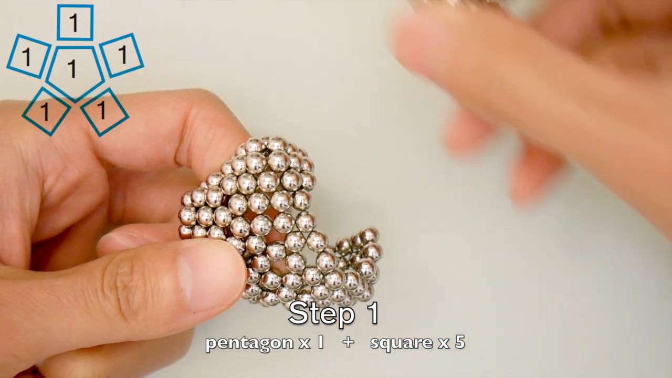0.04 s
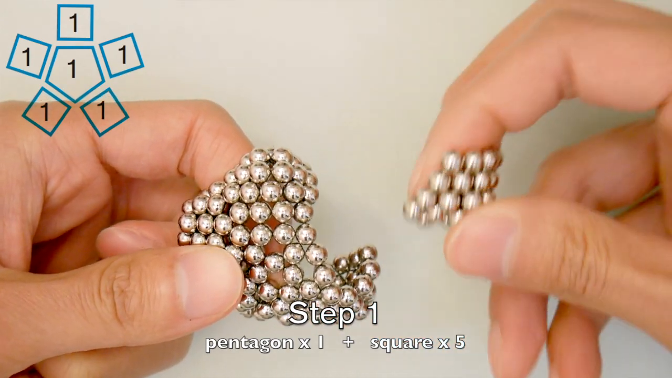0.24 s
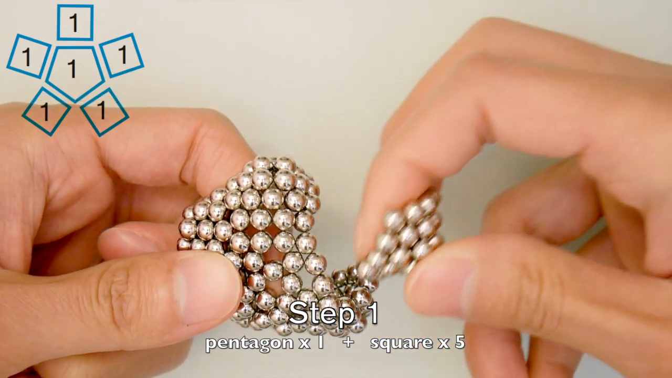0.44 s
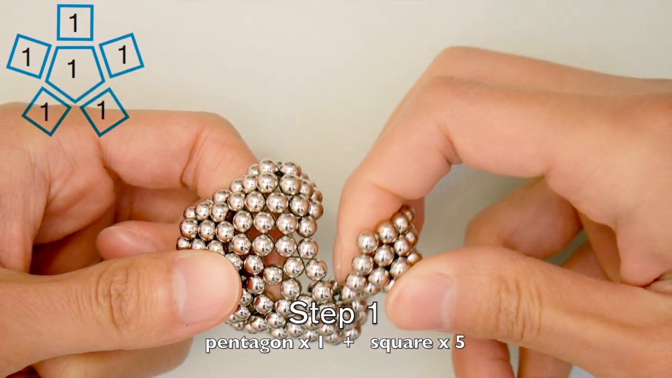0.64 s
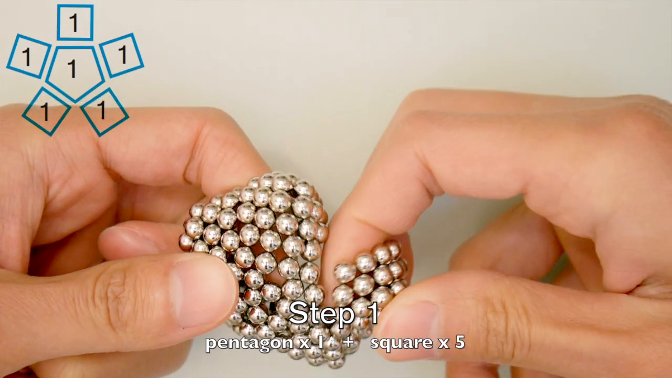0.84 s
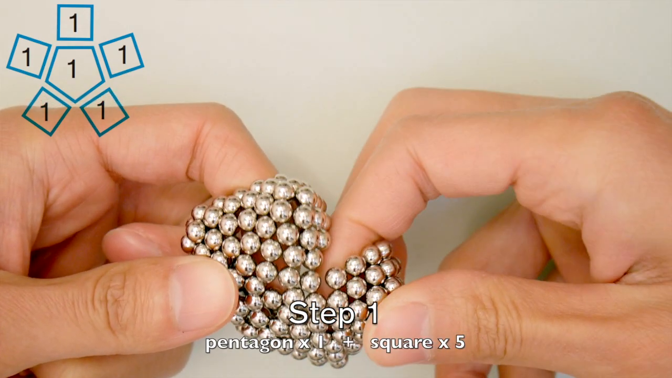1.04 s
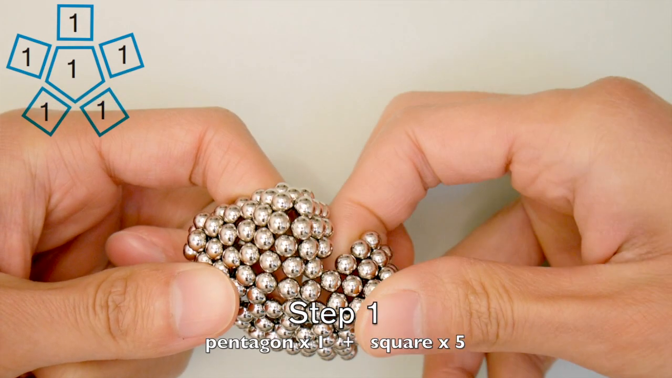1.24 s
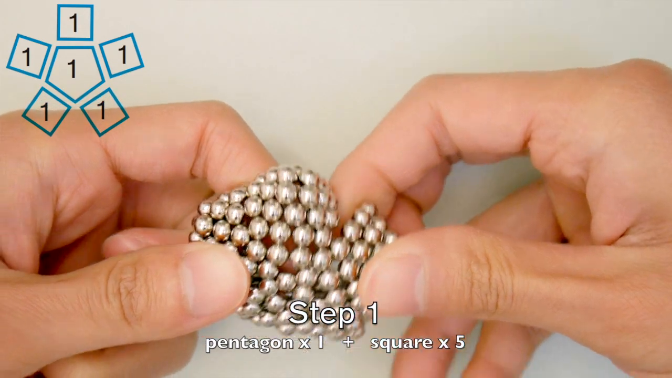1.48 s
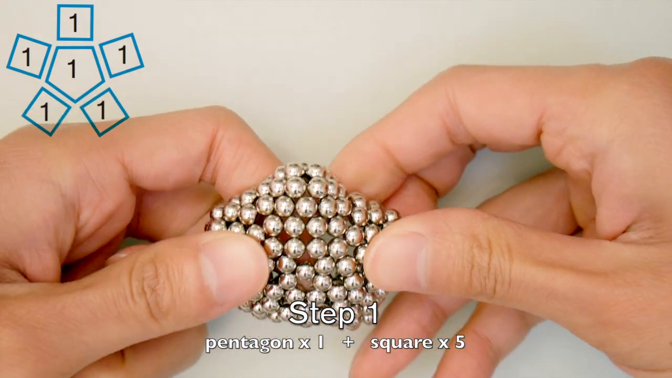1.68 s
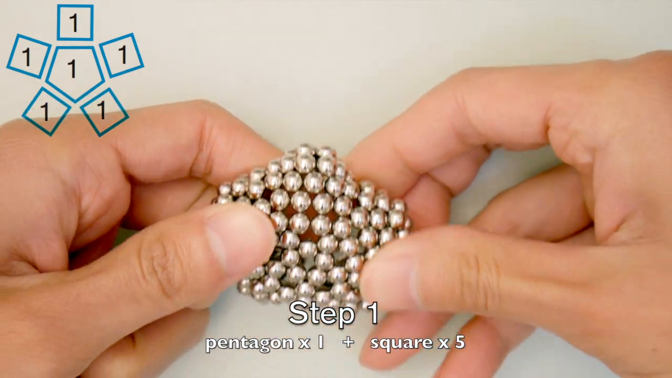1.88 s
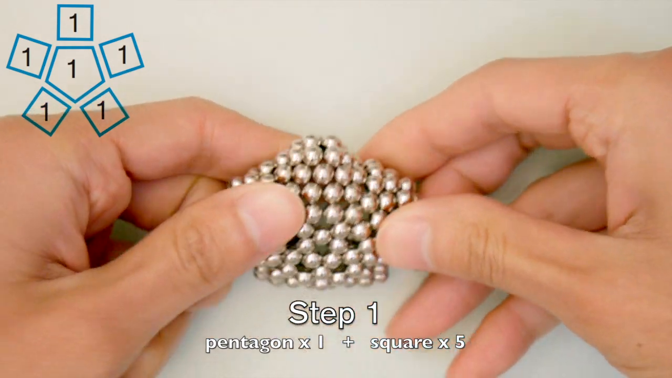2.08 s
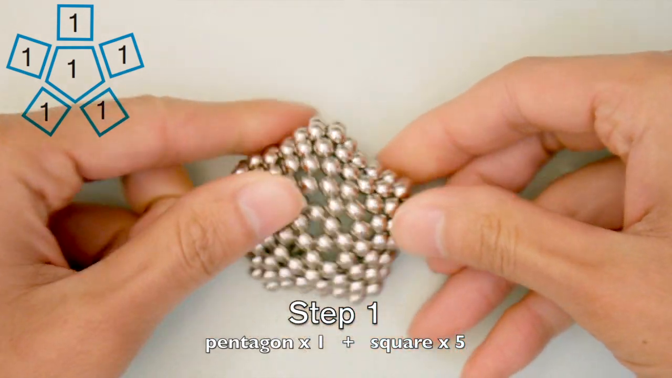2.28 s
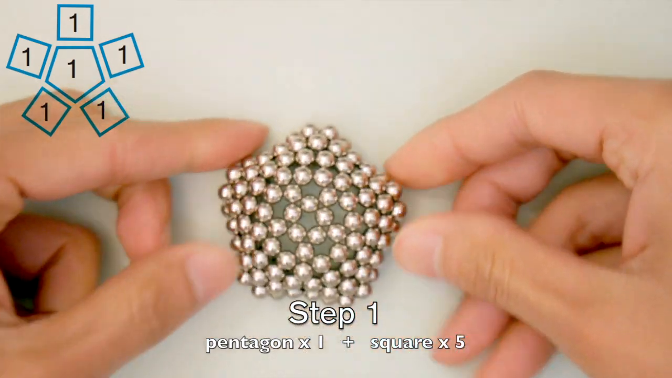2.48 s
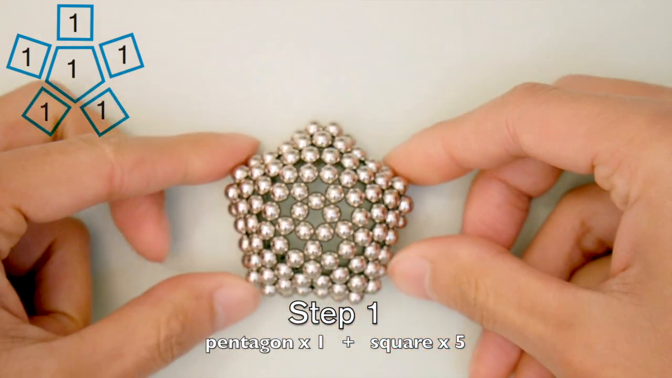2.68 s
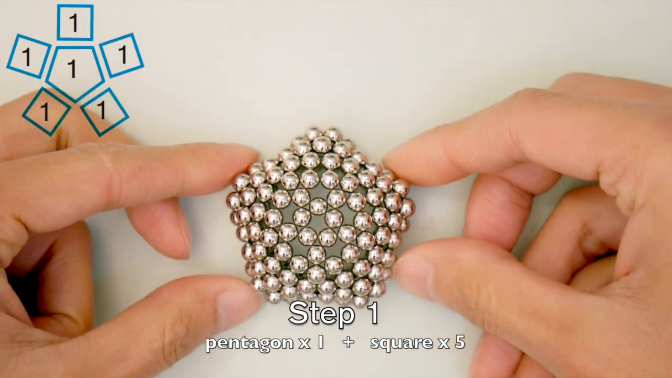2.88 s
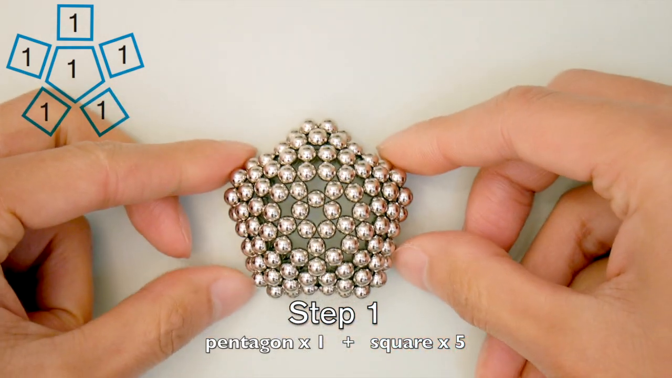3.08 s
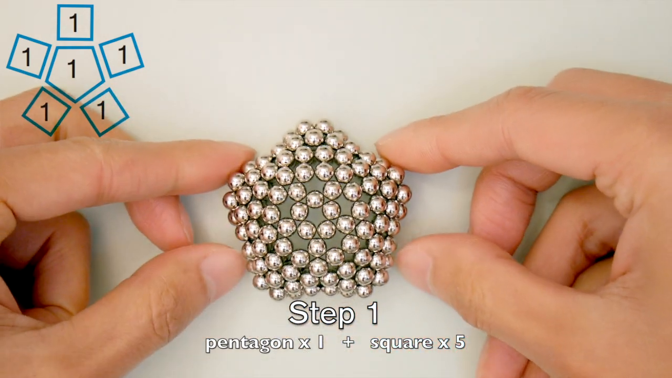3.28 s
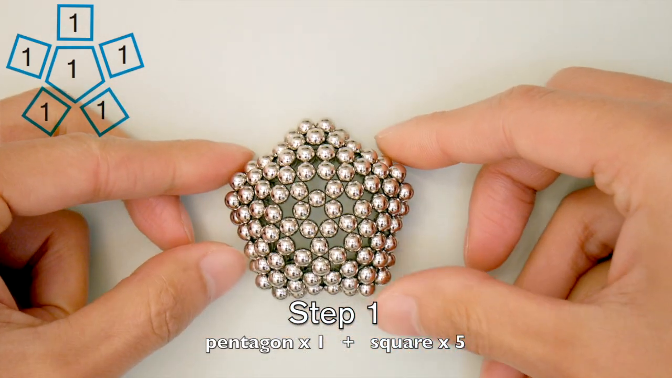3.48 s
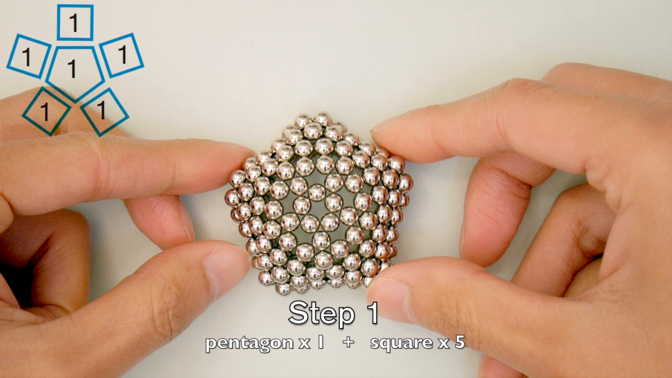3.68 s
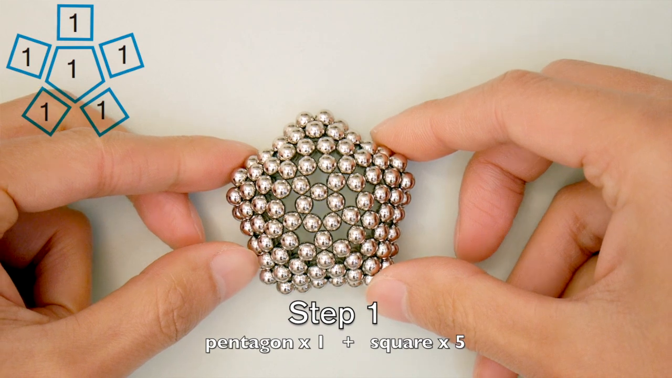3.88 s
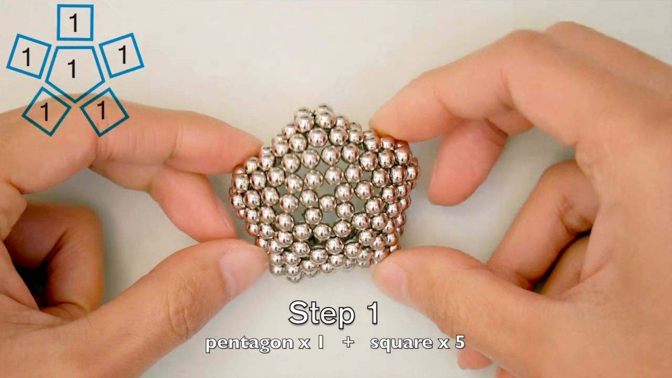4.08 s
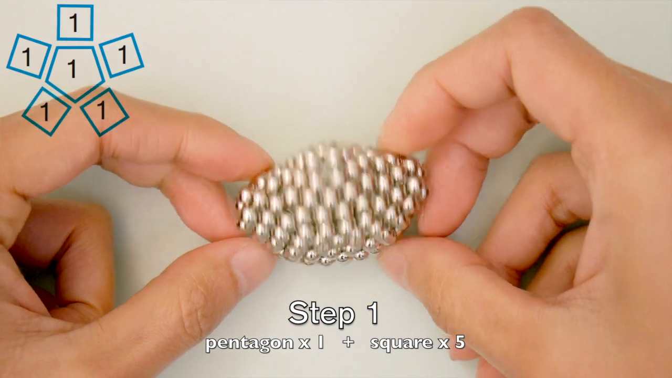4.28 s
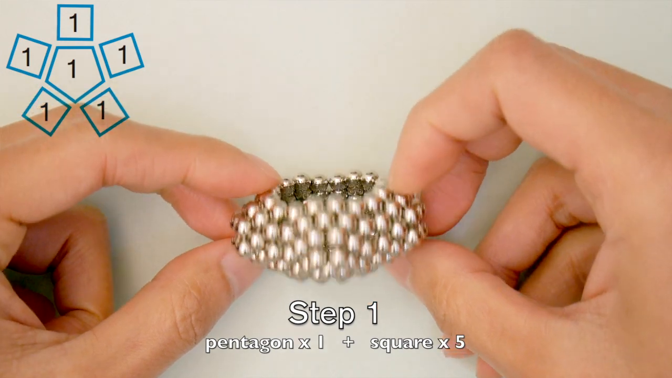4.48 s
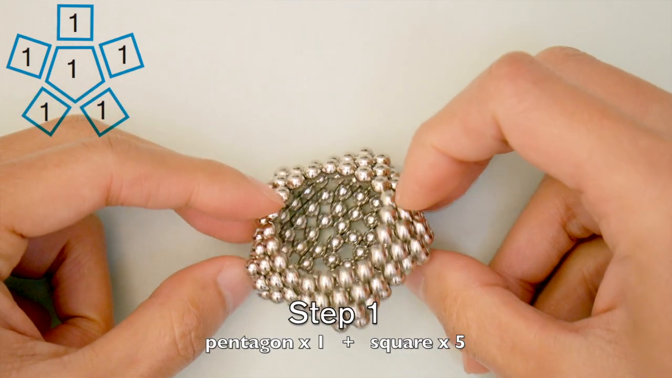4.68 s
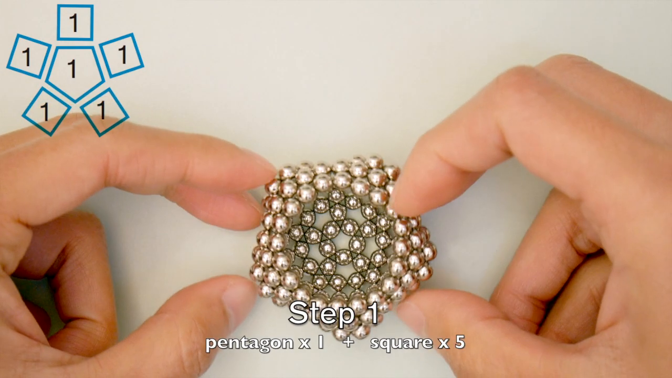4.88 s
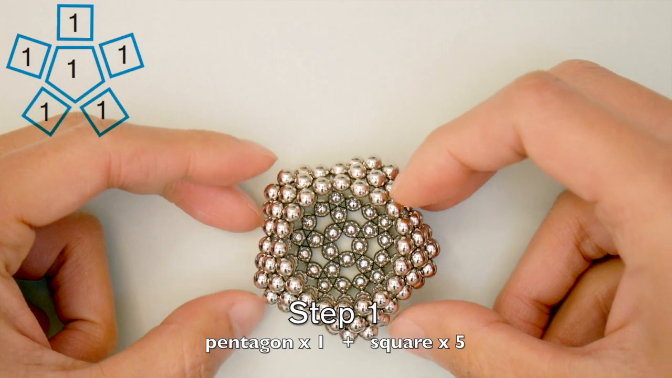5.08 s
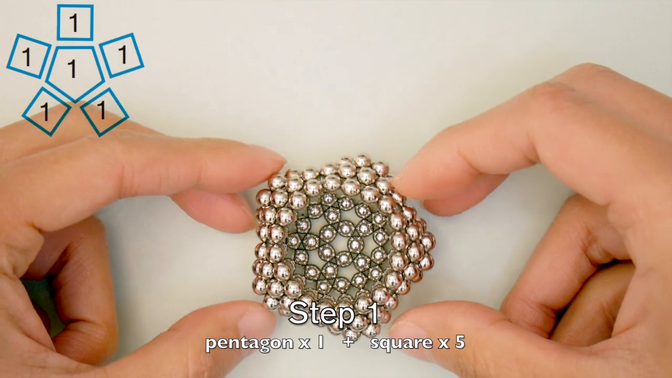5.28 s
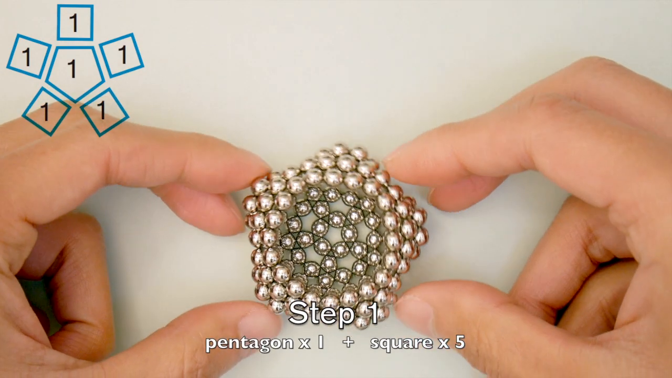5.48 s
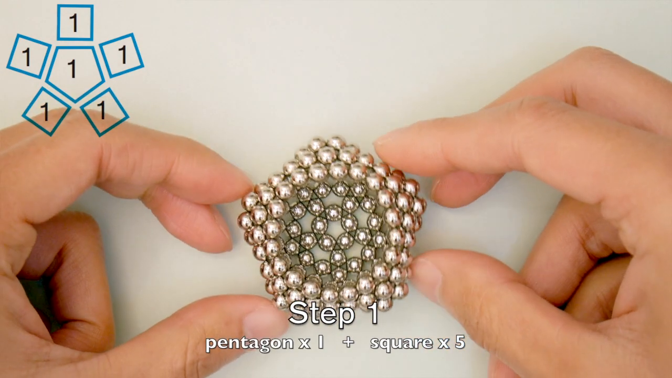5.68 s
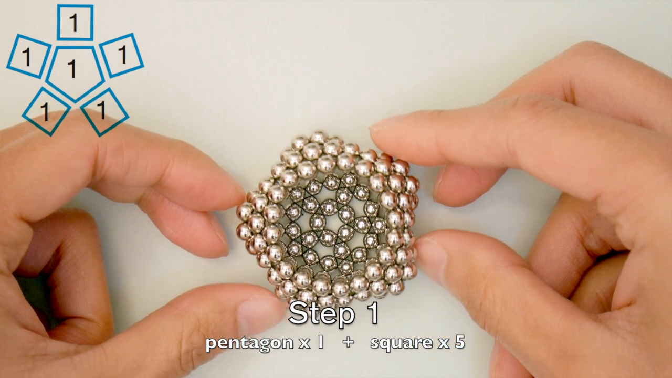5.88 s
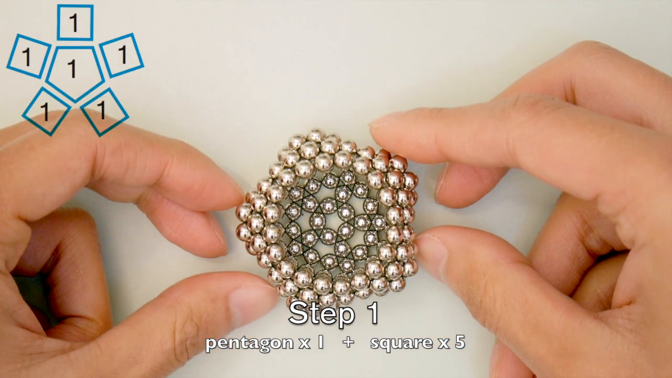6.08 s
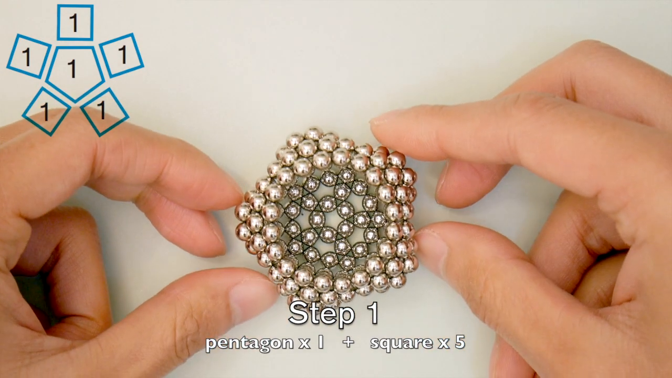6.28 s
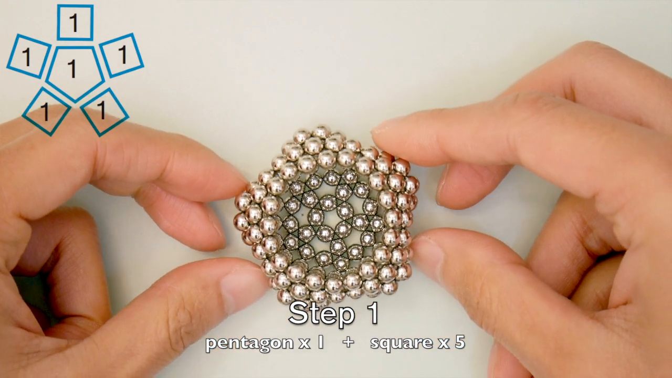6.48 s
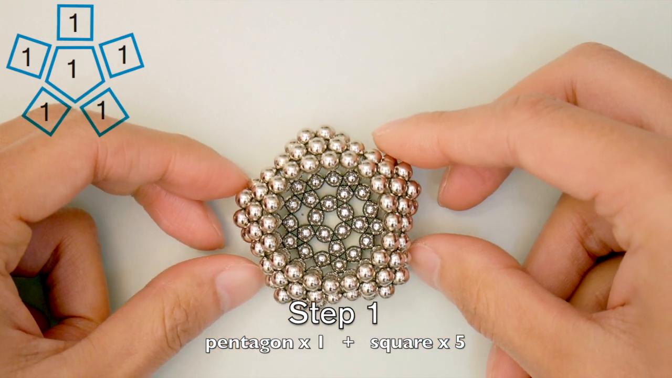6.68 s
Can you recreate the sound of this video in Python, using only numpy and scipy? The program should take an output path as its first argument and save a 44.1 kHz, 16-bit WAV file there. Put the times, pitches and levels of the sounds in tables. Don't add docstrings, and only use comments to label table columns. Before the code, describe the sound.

Small steel magnet balls rattle and snap together, then the cluster knocks hard on a wooden table and is later rolled over, above low room hum.

```python
import sys
import numpy as np
from scipy import signal
from scipy.io import wavfile
from scipy.ndimage import uniform_filter1d

SR = 44100
rng = np.random.default_rng(int(sys.argv[2]) if len(sys.argv) > 2 else 0)


def linear_from_db(decibels):
    return 10 ** (np.asarray(decibels, float) / 20)


def wav_record(signal):
    frames = np.transpose(np.atleast_2d(signal))
    bounded = np.clip(frames, -1, 1)
    quanta = np.round(bounded * 32767).astype(np.int16)
    wavfile.write(sys.argv[1], SR, quanta)


N = 297448


def evened(x):
    return x / np.sqrt(np.mean(x ** 2) + 1e-20)


def read(points, hz):
    f, value = np.transpose(points)
    return np.interp(np.log(hz + 1), np.log(f + 1), value)


def add(mix, s, sound):
    part = mix[..., round(s * SR):][..., :sound.shape[-1]]
    part += sound[..., :part.shape[-1]]


def cut(x, hz, kind, order):
    return signal.sosfilt(signal.butter(order, hz, kind, fs=SR, output="sos"), x)


def struck(colour, size=4096):
    gain_db = np.maximum(read(colour, abs(np.fft.fftfreq(size, 1 / SR))), -100)
    log_gain = np.log(linear_from_db(gain_db))
    taps = np.fft.ifft(np.exp(np.conj(signal.hilbert(log_gain)))).real[:size // 2]
    return taps / np.linalg.norm(taps)


def level(strokes):
    t = np.arange(0, N / SR + .002, .001)
    s, db, rise, fall = np.transpose(strokes)[..., None]
    slope_s = np.maximum(np.where(t < s, rise, fall), .002)
    gain = linear_from_db(db - 20 * abs(t - s) / slope_s).sum(axis=0)
    return np.interp(np.arange(N) / SR, t, gain)


# pitch_hz, fade_s (time to fall 60 dB)
ROOM_FADE = [(100, 0.14), (400, 0.52), (1200, 0.31), (4000, 0.16), (10000, 0.24), (15000, 0.1)]


def room(x, wet_db, same):
    taps = np.zeros((2, SR // 2))
    at = np.arange(100, SR // 2 - 12, 12) + rng.integers(0, 12, (2, (SR // 2 - 101) // 12))
    np.put_along_axis(taps, at, rng.choice([-1., 1.], at.shape), 1)
    hz, t, z = signal.stft(taps, SR, nperseg=256)
    fading = linear_from_db(-60 * t / read(ROOM_FADE, hz)[:, None])
    left, other = signal.istft(z * fading, SR, nperseg=256)[1]
    same = np.clip(same, 0, 1)
    tail = np.array([left, same * left + np.sqrt(1 - same ** 2) * other])
    return linear_from_db(wet_db) * signal.fftconvolve(x, tail / np.linalg.norm(left), axes=1)[:, :N]


# pitch_hz, likeness (0-1)
LIKENESS = [(60, 0.09), (130, 0.82), (290, 0.67), (640, 0.3), (1410, 0.94), (3100, 0.5), (6820, 0.49),
            (15000, 0.34)]
# pitch_hz, left_over_right_db
LEAN_LEFT = [(60, 13.5), (110, 9.5), (200, 0.5), (380, 0), (700, 4.5), (1290, -1), (2380, 1), (4400, -1),
             (8120, 1), (15000, -2.5)]


def air(colour, db, patchy_db, swell_db):
    frames, hz = N // 512 + 5, np.fft.rfftfreq(2048, 1 / SR)
    a, b, c, d, patches = rng.standard_normal((frames, 1025, 5)).T
    patches = uniform_filter1d(patches, size=6, axis=0)
    patches = evened(uniform_filter1d(patches, size=24, axis=1))
    t = np.arange(frames) * 512 / SR
    swell = evened(sum(np.sin(2 * np.pi * (f * t + rng.random())) / np.sqrt(f)
                       for f in np.geomspace(.15, 3, 20)))
    same = np.clip(read(LIKENESS, hz), -1, 1)[:, None]
    lean = linear_from_db(read(LEAN_LEFT, hz) / 2)[:, None]
    left = a + 1j * b
    right = same * left + np.sqrt(1 - same ** 2) * (c + 1j * d)
    z = np.array([left * lean, right / lean])
    z *= linear_from_db(read(colour, hz)[:, None] + patchy_db * patches + swell_db * swell)
    return linear_from_db(db) * evened(signal.istft(z, nperseg=2048, noverlap=1536)[1][:, :N])


def machine(peaks, steady_db, swells):
    out, noise = np.zeros((2, N)), rng.standard_normal((N, 2)).T
    shared = noise + 0.66 * noise[::-1]
    for hz, width, db in peaks:
        band = signal.iirpeak(hz, hz / np.clip(width, 8, 200), SR)
        once = signal.lfilter(*band, shared)
        out += linear_from_db(db) * signal.lfilter(*band, once)
    return (linear_from_db(steady_db) + level(swells)) * evened(out)


# pitch_hz, level_db, waver_db
MAINS_TONES = [(48.7, -78, 1), (102, -69.5, 3.5), (127.7, -73, 5.5)]


def mains():
    t = np.arange(N) / SR
    noise = rng.standard_normal((N, len(MAINS_TONES))).T
    wavers = evened(uniform_filter1d(uniform_filter1d(noise, size=3000), size=3000))
    out = np.zeros(N)
    for (hz, db, waver_db), waver in zip(MAINS_TONES, wavers):
        strength = np.sqrt(2) * linear_from_db(db + waver_db * waver)
        out += strength * np.sin(2 * np.pi * hz * t + 0.13 * waver_db * waver)
    return out


# pitch_hz, level_db (per Hz)
HUM_COLOUR = [(44, -45.5), (75, -11.5), (86, -8), (107, -2), (150, -7.5), (167, -6.5), (190, 2.5),
              (245, -11), (311, -12), (401, -7.5), (509, -10.5), (691, -13.5), (890, -15), (976, -13),
              (1800, -31.5), (2340, -83), (3960, -120)]
# pitch_hz, level_db (per Hz)
HISS_COLOUR = [(1290, -87), (2200, -14.5), (2690, -21), (2940, -9), (3270, -17.5), (4130, -10.5),
               (4860, -7.5), (5530, -2), (6500, 2), (8090, 1), (8420, 2), (9590, 4), (13100, -6),
               (14500, -11), (15200, -17)]
# pitch_hz, width_hz, level_db
DRONE_PEAKS = [(667, 195, 2), (990, 200, -4)]
WHIRR_PEAKS = [(290.8, 85, 0)]
# peak_s, level_db, rise_s, fall_s (both over 20 dB)
DRONE_COMES = [
    (0.2, -79.5, 5.5, 0.73),
    (1.65, -65.5, 4, 0.42),
    (2.42, -54, 0.34, 0.47),
    (3.1, -70, 1, 4.3),
    (5.2, -72, 1.2, 2.7),
]
# peak_s, level_db, rise_s, fall_s (both over 20 dB)
WHIRR_COMES = [
    (0.02, -59.5, 0.22, 0.96),
    (1.7, -63, 2.1, 0.55),
    (2.7, -62.5, 0.32, 5.6),
    (3.25, -67, 2.2, 0.18),
    (4.352, -75, 0.35, 0.51),
    (4.838, -62.5, 0.8, 0.2),
    (5.75, -65.5, 0.36, 2),
]


def background():
    hum = cut(air(HUM_COLOUR, -60, 1.8, .8), 1900, "low", order=5)
    rumble = air([(15, 1.5), (30, 10), (60, 0), (80, -16), (200, -90)], -86.5, 0.14, .3)
    drone = machine(DRONE_PEAKS, -93, DRONE_COMES)
    whirr = machine(WHIRR_PEAKS, -84.5, WHIRR_COMES)
    hiss = cut(air(HISS_COLOUR, -75, .6, .3), 15400, "low", order=20)
    return hum + rumble + drone + whirr + hiss + mains() * linear_from_db([[1.5], [-1.5]])


# pitch_hz, level_db (per Hz)
STEEL_COLOUR = [(1470, -66.5), (2500, -48), (2730, -72), (3950, -37), (4170, -31), (4480, -25.5),
                (7180, -7), (7760, -8.5), (9830, -2.5), (11700, -4.5), (13200, -11.5), (15200, -24),
                (16500, -49)]
# pitch_hz, level_db (per Hz)
CLACK_COLOUR = [(1200, 6.5), (1800, -6.5), (2500, -13), (3500, -9.5), (4500, -2.5), (5300, -2), (6500, -1),
                (8000, -21.5), (10000, -43)]
# start_s, peak_db, left_over_right_db, chatter_pitch_hz, clack_db
ROW_SNAPS = [(0.0117, -43, 4, 8900, -22), (0.0135, -38.5, -5, 6060, -40), (0.0165, -46, -9, 10400, -27),
             (0.5967, -18, -3.5, 10040, -49), (0.8071, -33.5, -2.5, 9040, -46), (0.977, -40, 3, 11800, -53),
             (0.9776, -44, 0, 8500, -53), (0.98, -27, -2, 7840, -54), (0.9802, -44, 5, 12500, -56),
             (0.9806, -28.5, -4, 10500, -60), (0.9812, -29, -4, 8400, -58), (0.9827, -32, 0, 10600, -64),
             (1.271, -57, 1.5, 11500, -32), (1.2716, -56, 0, 8600, -40), (1.3066, -38.5, -1, 6000, -53),
             (1.3074, -41.5, -3, 10150, -50), (1.3096, -44, -2, 10500, -50), (1.3113, -54, 0, 9000, -50),
             (1.3142, -54, -3, 11500, -54), (2.1475, -30.5, -2, 10600, -22.5),
             (2.1537, -31.5, -4, 10400, -28), (2.2032, -38, -2, 11100, -20.5), (2.2623, -46, -1, 6600, -31),
             (2.2635, -60, 0, 9500, -33), (2.4204, -25, 0.5, 10630, -18), (2.4235, -28.5, -17, 9760, -39),
             (2.4354, -43, -1.5, 10600, -50), (2.4378, -30, -0.5, 10640, -43), (2.3085, -50, -3, 6400, -24),
             (2.3245, -50, -1.5, 7500, -31), (4.0922, -38, -2, 11500, -18.5), (4.0925, -41, -4, 8800, -30),
             (4.0946, -44, -7, 10200, -41), (4.098, -46, -2, 11500, -23), (4.6259, -47, -3, 6270, -38),
             (4.6285, -57, 3, 9450, -38), (4.9729, -39, -2, 11000, -21.5)]
# start_s, peak_db, left_over_right_db
BALL_SHIFTS = [(0.173, -54, -3), (0.188, -52, 1), (0.211, -59, 0), (0.451, -59, 0), (1.8047, -56.5, 2),
               (2.159, -38.5, 4), (2.168, -55, 2), (2.322, -53, -1), (2.811, -60.5, 9), (4.242, -58, 0.5),
               (4.4387, -55, 1), (4.491, -52.5, 1), (4.683, -53, -5), (4.807, -56, -1), (4.944, -51, -1),
               (4.949, -60, 0), (4.956, -48, 1), (4.965, -58, 0)]
# delay_s, level_db
NEAR_ECHOES = [
    (.001, -13),
    (.0024, -10),
    (.0048, -15),
    (.0074, -13),
    (.012, -17),
]
# pitch_hz, left_over_right_db
SIDE_SHADE = [(2000, -10.5), (5000, -8), (8500, -1), (11500, -6), (14000, -12.5)]


def ticks():
    near, spread, t = np.zeros((2, N)), np.zeros((2, N)), np.arange(80) / SR
    steel, clack = struck(STEEL_COLOUR)[:600], struck(CLACK_COLOUR)[:600]
    shift_hz, shift_clack_db = 9500, -21.5
    rows = ROW_SNAPS + [(*row, shift_hz, shift_clack_db) for row in BALL_SHIFTS]
    luck = rng.standard_normal((len(rows), 80))
    for (s, db, pan_db, hz, mass_db), chance in zip(rows, luck):
        db = float(db)
        chatter_s = .0002 if db > -27 else .0001
        contacts = (np.cos(2 * np.pi * hz * t) + .5 * chance) * t ** 2 * np.exp(-t / chatter_s)
        contacts[8] += .9 * abs(contacts).max()
        tick = np.convolve(contacts, steel)
        tick /= abs(tick).max()
        mass = linear_from_db(mass_db + 20.0) * clack / abs(clack).max()
        gain = linear_from_db(db) * linear_from_db([[pan_db / 2], [-pan_db / 2]])
        add(spread, s, gain * (np.linalg.norm(tick) * steel + mass))
        tick[8:608] += mass
        add(near, s + .0009, gain * tick)
    echoed = near.copy()
    for k, (s, db) in enumerate(NEAR_ECHOES):
        add(echoed[0], s, linear_from_db(db) * near[0])
        add(echoed[1], s + (-1) ** k * .00009, linear_from_db(db) * near[1])
    echoed += cut(room(spread, -3.0, 0.52), 14400, "low", order=14)
    shade = np.array([struck([(hz, side * db / 2) for hz, db in SIDE_SHADE], size=256) for side in (1, -1)])
    return signal.oaconvolve(echoed, shade, axes=1)[:, :N]


# peak_s, level_db, rise_s, fall_s (both over 20 dB)
RUB_STROKES = [(0.03, -62, 0.12, 0.17), (0.105, -69, .06, 0.088), (0.208, -57, 0.11, 0.081),
               (0.26, -66, .04, 0.047), (0.43, -71.5, 0.065, 0.58), (0.575, -74, 0.036, 0.0074),
               (1.676, -72, 1, 0.03), (1.86, -84, .015, 0.035), (2.0, -72, .2, 0.7),
               (2.228, -62, .01, 0.076), (2.315, -70.5, 0.12, 0.85), (2.385, -77, 0.036, 0.19),
               (2.408, -61, 0.014, 0.0052), (2.61, -71.5, 0.18, 0.047), (2.8, -79, 0.58, 1),
               (4.135, -66.5, 0.044, 0.061), (4.24, -78, .03, 0.15), (4.385, -69, 0.02, 0.15),
               (4.45, -82, 0.095, 0.082), (4.65, -65, .015, 0.096), (4.815, -67, 0.041, 0.06),
               (4.933, -69, .045, 0.011), (4.962, -55, .02, 0.032), (5.003, -68, 0.013, 0.047),
               (5.14, -83, 0.1, 0.016)]


def rubs():
    size = linear_from_db(4.8 * np.minimum(rng.exponential(1, (N, 2)), 4)).T
    grains = size * rng.standard_normal((N, 2)).T
    grains = grains * (rng.random(N) < 5000 / SR)
    ball = (struck(STEEL_COLOUR) + 0.33 * struck(CLACK_COLOUR))[None, :600]
    dry = evened(signal.oaconvolve(grains + 0.66 * grains[::-1], ball)[:, :N]) * level(RUB_STROKES)
    dry = cut(dry, 14800, "low", order=8)
    return linear_from_db(-12.0) * dry + room(dry, -3.5, 0.4)


def rings(modes):
    t = np.arange(SR // 2) / SR
    out = np.zeros(len(t))
    for hz, db, t60 in modes:
        fade_s = np.clip(t60, .03, min(.8, 250 / hz))
        out += linear_from_db(db - 60 * t / fade_s) * np.sin(2 * np.pi * hz * t)
    out *= 1 - np.exp(-t / .004)
    return out / np.linalg.norm(out)


# start_s, peak_db, place (0 edge - 1 middle), hardness (0-1)
TABLE_KNOCKS = [(0.05, -52, 0.25, .5), (0.08, -45, 0.36, 0.73), (0.172, -46, 0.56, 0.9),
                (0.242, -45, 0, 0.6), (0.277, -73, 0.7, .8), (0.189, -42.5, 0, 1), (0.2, -39, 0.1, 0.47),
                (0.832, -55, 0.35, 0.9), (0.833, -48, 0.46, 0.54), (0.8357, -48, 0.7, 0.5),
                (0.841, -48, .3, 0.16), (1.579, -51, 0.85, 0.52), (1.64, -58, 0.5, 0.8),
                (2.1471, -23, 0, 0.25), (2.1539, -19.5, 0.29, 0.64), (2.1576, -34, 0.3, 0.94),
                (2.202, -38, 0.1, 0), (2.421, -10, 0.78, 0.43), (2.4404, -21, 0.72, 0.47),
                (2.445, -22.5, 0.54, 0.48), (2.457, -30, 1, 0.43), (2.4646, -24.5, 0.6, 0.08),
                (2.561, -60, 0.8, 0.7), (2.781, -50, 0.55, 0.63), (3.22, -53, 0.5, 0.6),
                (4.0924, -32, 0.82, 0.54), (4.0977, -47, 0.7, 0.17), (4.129, -39, 0.15, 0.08),
                (4.145, -63, 0.8, 0.5), (4.381, -45.5, 0.6, 0.3), (4.395, -46, 1, 0.58),
                (4.43, -47, 0.9, 0.57), (4.418, -40, 0.7, 0), (4.442, -43, 0.7, 0.1),
                (4.491, -48, 0.96, 0.44), (4.643, -43, 0.5, 0.2), (4.648, -36.5, 0.3, 0),
                (4.688, -43, 0.56, 0.3), (4.682, -47, 0.8, 0), (4.694, -45, 1, 0), (4.783, -44, 0.2, 0.2),
                (4.945, -49, 0.7, 0), (4.956, -35, 0.13, 0.01), (4.972, -33, 0.23, 0), (4.984, -51, 0.5, 0),
                (5.379, -49, 0.4, 0.26), (5.459, -53.5, 0.97, 0.9), (5.701, -48, 0.61, 0.64)]
# peak_s, level_db, rise_s, fall_s (both over 20 dB)
TABLE_ROLLS = [(0.182, -56.5, 0.14, 0.23), (2.21, -39, 0.01, 0.0025), (2.23, -60, .01, 0.2),
               (2.405, -45.5, 0.24, 0.0041), (4.107, -42, 0.02, 0.0038), (4.139, -47, 0.031, 0.028),
               (4.19, -52.5, .03, 0.28), (4.4, -42.5, 0.031, 0.072), (4.425, -43, 0.0098, 0.085),
               (4.655, -48, 0.08, 0.042), (4.7, -48.5, 0.069, 0.016), (4.742, -71, 0.018, 0.03),
               (4.8, -54, 0.035, 0.32), (4.962, -41, 0.031, 0.044), (5.24, -67, 0.14, .02)]
# pitch_hz, level_db (per Hz)
WOOD_COLOUR = [(35, -58.5), (60, -21), (204, -9.5), (454, -5), (944, -9), (1030, -10), (1370, -14),
               (1770, -26.5), (2170, -25.5), (2410, -99), (3500, -30), (4550, -71), (7700, -120)]
# pitch_hz, level_db, fade_s (time to fall 60 dB)
MIDDLE_TONES = [(284, -3, 0.72), (316.7, 6.5, 0.55), (342.5, 10.5, 0.53), (360.6, 9, 0.36),
                (422.3, 14, 0.17), (473.6, 10, 0.22), (546, 11, 0.37), (570, 0, 0.48), (654, 1.5, 0.4),
                (659, -2, 0.16), (812, 7.5, 0.085), (950, 4, 0.11), (1090, -12, 0.15), (1410, -4, 0.2)]
# pitch_hz, level_db, fade_s (time to fall 60 dB)
EDGE_TONES = [(133.7, 5, 0.37), (207.3, -1, 1), (293, -12.5, .6), (299.5, 3, 0.38), (317.8, 8, 0.19),
              (469, 1, 0.2), (504, -22, 0.17), (700, -16, 0.1), (843.4, 12, 0.15), (870, -1, 0.24),
              (957, -3, 0.19), (1114, -15, 0.19), (1316, -5, 0.2)]


def table():
    middle, edge, wood = np.zeros(N), np.zeros(N), struck(WOOD_COLOUR)
    t = np.arange(len(wood)) / SR
    flex = t * linear_from_db(-60 * t / .009) * np.sin(2 * np.pi * 530 * t)
    slap = wood + linear_from_db(5.5) * flex / np.linalg.norm(flex)
    for s, db, place, hard in TABLE_KNOCKS:
        push = np.hanning(int(np.clip(70 - 90 * hard, 4, 120)))
        size = linear_from_db(db) / abs(np.convolve(push, slap)).max()
        place = np.clip(place, 0, 1)
        add(middle, s + .001, size * place * push)
        add(edge, s + .0006, -size * (1 - place) * push)

    bumps = linear_from_db(2.5 * rng.exponential(1, N)) * rng.choice([-1., 1.], N) * (rng.random(N) < 900 / SR)
    bumps = evened(uniform_filter1d(bumps, size=20)) * np.roll(level(TABLE_ROLLS), -350) / np.sqrt(20)

    thud = linear_from_db(3) * signal.oaconvolve(middle, slap)[:N]
    add(thud, .0064, linear_from_db(-7.5) * thud.copy())
    thud += linear_from_db(3) * signal.oaconvolve(edge, wood)[:N]
    ring = linear_from_db(5.0) * signal.oaconvolve(middle, rings(MIDDLE_TONES))[:N]
    ring += linear_from_db(9.5) * signal.oaconvolve(edge, rings(EDGE_TONES))[:N]

    def held(modes):
        return rings([(hz, db, 0.21 * t60) for hz, db, t60 in modes])[:len(wood)]

    body = linear_from_db(-1.5) * held(MIDDLE_TONES[:6] + 2 * EDGE_TONES[:4])
    body += linear_from_db(-12.5) * held(EDGE_TONES[:2])
    body += linear_from_db(-10.5) * held(MIDDLE_TONES[5:8])
    body += linear_from_db(-14.0) * wood
    roll = signal.oaconvolve(bumps, body)[:N]
    pushes = middle + edge
    echo = room(signal.oaconvolve(pushes + .3 * bumps, wood)[None, :N], -3.0, .8)
    jolt = linear_from_db(4.0) * cut(cut(pushes, 80, "low", order=2), 40, "high", order=2)
    return jolt + cut(thud + ring + roll + echo, 98, "high", order=3)


def scene():
    return background() + ticks() + rubs() + table()


# start_s, end_s, top_hz
DULL_MOMENTS = [(0, .12, 13900), (.16, .3, 14300), (.63, .7, 13500), (.83, .86, 13200), (1.0, 1.08, 13700),
                (2.175, 2.185, 14000), (2.225, 2.25, 13500), (2.28, 2.4, 14300), (2.49, 2.56, 14300),
                (1.33, 1.345, 13500), (4.65, 4.68, 13600), (4.964, 5.03, 13000), (5.36, 5.45, 14100)]
# pitch_hz, missing_share (0-1)
MISSING_TREBLE = [(11500, 0), (12500, .06), (13500, .2), (14300, .4), (15000, .6)]


def ragged(x):
    hz, t, z = signal.stft(x, SR, nperseg=2048, noverlap=1536)
    luck = rng.standard_normal((len(t), len(hz))).T
    patches = uniform_filter1d(luck, size=4, axis=0)
    patches = evened(uniform_filter1d(patches, size=5, axis=1))
    edge_hz, wander_hz = 14850, 260
    wander = evened(uniform_filter1d(luck[0], size=4))
    edge = np.minimum(edge_hz + wander_hz * wander, edge_hz + wander_hz)
    treble = (abs(z[:, hz > MISSING_TREBLE[1][0]]) ** 2).sum(axis=(0, 1))
    usual = np.median(treble)
    edge[treble > linear_from_db(2 * 9) * usual] = SR
    for start, end, top_hz in DULL_MOMENTS:
        edge[(t > start) & (t < end)] = top_hz
    rank = .5 + .5 * np.tanh(.85 * patches)
    whole = (rank > read(MISSING_TREBLE, hz)[:, None]) | (treble > 4 * usual)
    keep = (hz[:, None] < edge) & whole
    return x - signal.istft(z * ~keep, SR, nperseg=2048, noverlap=1536)[1][:, :N]


def top_cut(x):
    return signal.sosfilt(signal.butter(12, 16550, fs=SR, output="sos"), x)


def record(dry):
    notch_hz, width_hz = 7850, 110
    notched = signal.lfilter(*signal.iirnotch(notch_hz, notch_hz / width_hz, SR), dry)
    return top_cut(ragged(notched))


dry = scene()
out = record(dry)
wav_record(out)
```